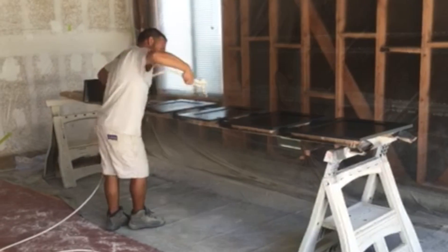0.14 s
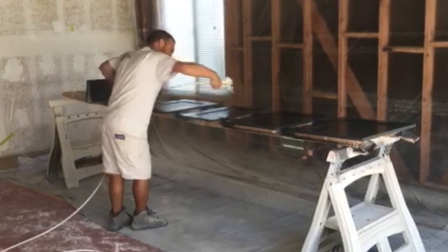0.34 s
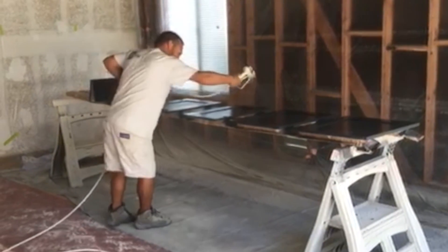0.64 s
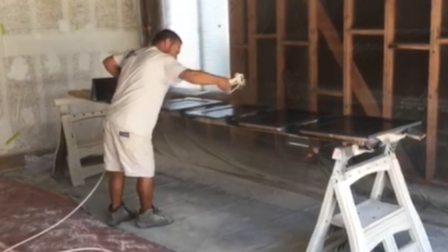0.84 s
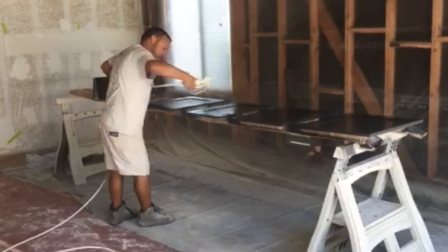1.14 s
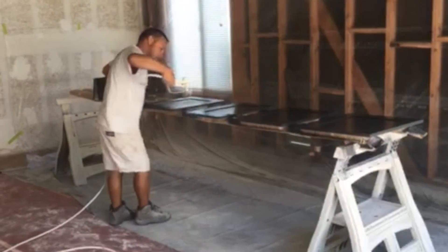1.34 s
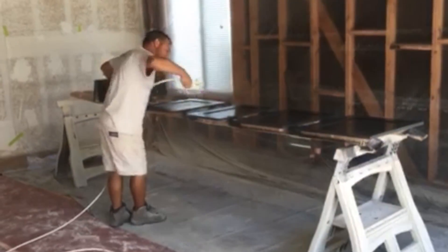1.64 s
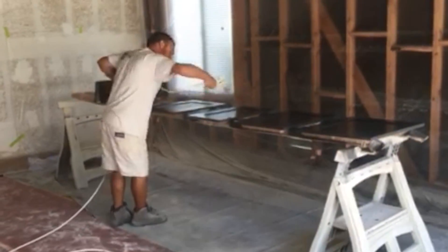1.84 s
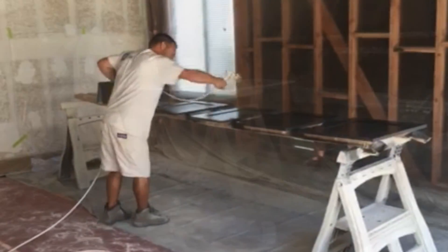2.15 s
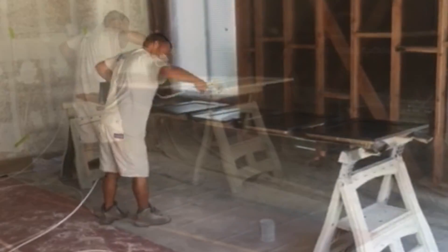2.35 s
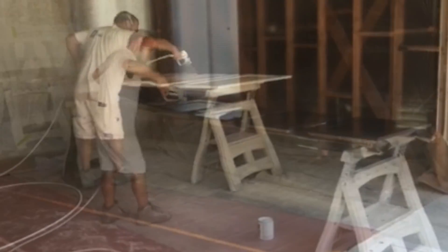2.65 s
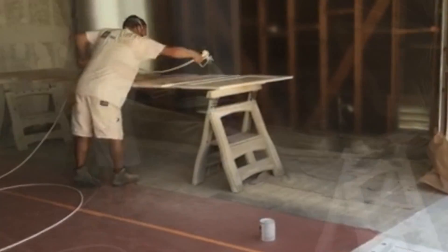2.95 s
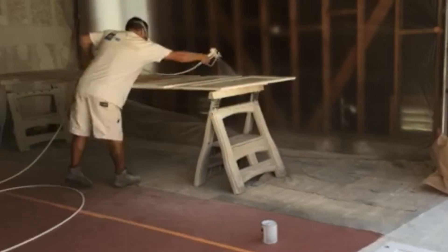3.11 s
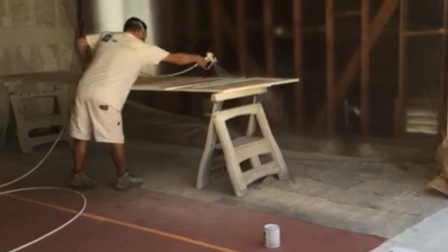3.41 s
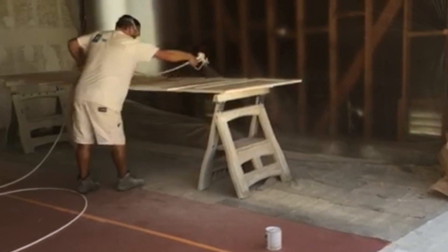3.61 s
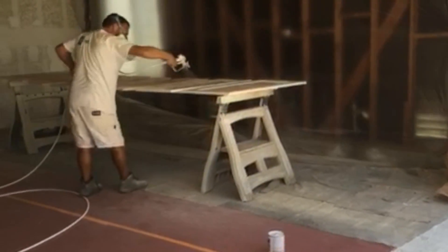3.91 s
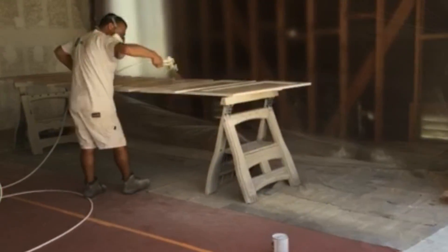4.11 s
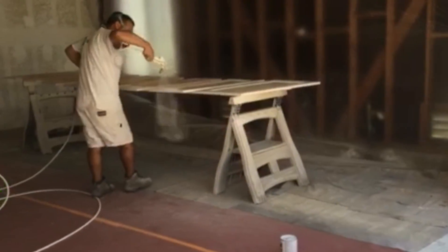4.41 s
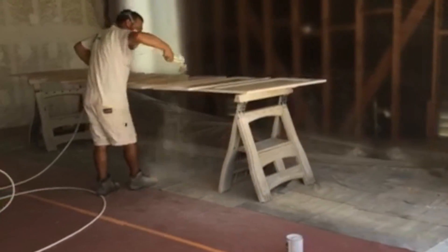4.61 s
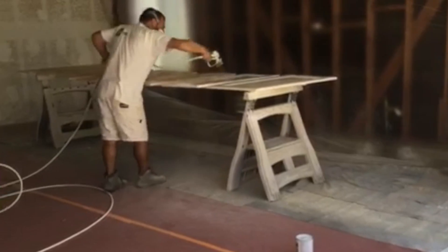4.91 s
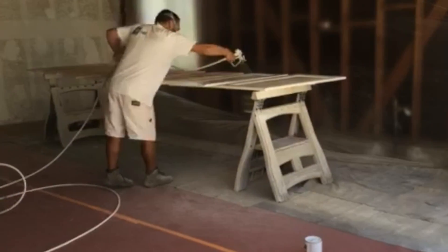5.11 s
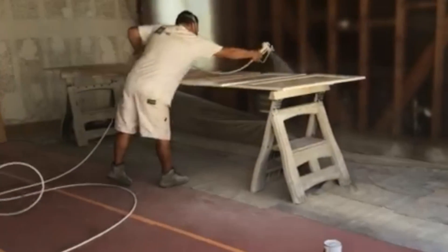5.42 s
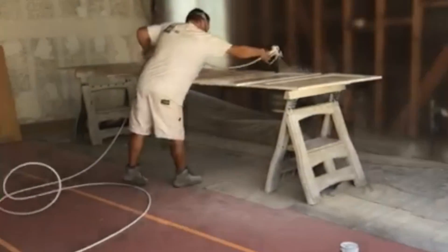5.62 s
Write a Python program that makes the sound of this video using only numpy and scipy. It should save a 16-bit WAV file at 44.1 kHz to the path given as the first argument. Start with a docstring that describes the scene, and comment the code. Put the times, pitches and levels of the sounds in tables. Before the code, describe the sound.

In a bare echoing garage, a paint sprayer's pump starts and stops, squealing on each stroke as hiss gives way to faint fizzing paint.

```python
"""A motor roars over a steady hiss while gears squeal: an airless paint pump in a bare garage.
It stops and starts again and again; each piston stroke makes a squeal that sags in pitch, and valves tick.
The hiss then falls away as the sound blends into a second, quieter view of the same room, where paint fizzes.
Roar, rasp, hiss and fizz are shaped noise; squeals are wavering tones; ticks are fading sine waves.
Sparse random echoes give the gears, valves and switch the ring of the garage."""
import sys
import numpy as np
from scipy import signal
from scipy.fft import rfft, irfft
from scipy.io import wavfile
from scipy.ndimage import uniform_filter1d

SR = 44100
rng = np.random.default_rng(int(sys.argv[2]) if len(sys.argv) > 2 else 0)


def store_wav(level_fs):
    """Save 16-bit WAV to argv[1]."""
    pcm = np.round(np.clip(np.atleast_2d(level_fs), -1, 1) * 32767)
    wavfile.write(sys.argv[1], SR, pcm.T.astype(np.int16))


N = 254016  # length in samples

# Piston strokes, which make the gears squeal and the motor work harder.
# Each row: start in seconds, squeal length in seconds, first pitch in Hz, last pitch in Hz,
# settling time constant in seconds, time to the loudest point in seconds, squeal level in dB before mixing,
# drop at the end in dB, how far the octave lies below in dB, motor surge in dB before its rise and fall.
STROKES = [ (0.0, 0.13, 1785, 1720, 0.028, 0.008, -45, 7, 14, 2.5),
           (0.156, 0.11, 2365, 2045, 0.024, 0.014, -40.5, 10, 21, 3.5),
           (0.291, 0.066, 2700, 2224, 0.015, 0.032, -40, 14, 18, 4.5),
           (0.422, 0.098, 2620, 2047, .025, .015, -38, 15, 20, 5),
           (0.563, 0.06, 2026, 1650, 0.046, .025, -47, 3, 9, 2.5),
           (0.822, 0.07, 1019, 659, 0.27, 0.026, -47.5, 5, 20, 3.5),
           (1.597, 0.081, 2180, 1906, 0.036, 0.06, -40.5, 22, 16, 3),
           (1.74, 0.1, 2550, 2095, 0.022, 0.019, -42, 11, 18, 5),
           (1.872, 0.11, 2480, 2124, 0.029, 0.024, -40.5, 14, 20, 5),
           (2.013, 0.062, 2057, 1623, .1, 0.042, -46.5, -2, 8, 3.5),
           (2.279, 0.069, 984, 609, .15, 0.023, -48.5, 6, 15, 6.5),
           (2.435, 0.046, 2290, 2142, .04, 0.021, -50.5, 10, 13, -2),
           (2.573, 0.036, 2430, 2170, 0.019, 0.015, -44, 16, 17, -0.5),
           (2.686, 0.055, 2490, 2010, 0.024, 0.026, -44, 9.5, 24, 3.5),
           (2.819, 0.061, 1920, 1280, 0.056, 0.065, -46, 10, 7.5, 4),
           (3.926, 0.102, 2223, 1893, 0.041, 0.018, -43, 9.5, 18, 3),
           (4.074, 0.072, 2430, 2097, 0.016, 0.037, -40, 22, 22, 3),
           (4.201, 0.084, 2273, 1363, 0.35, 0.014, -45.5, 4.5, 13, 3),
           (4.393, 0.071, 1391, 1265, 0.022, 0.0098, -44, 14, 14, 3),
           (5.287, 0.11, 2192, 1870, 0.038, 0.014, -43, 10, 22, 3.5),
           (5.433, 0.067, 2338, 2040, 0.095, 0.05, -40.5, 11, 20, 4),
           (5.575, 0.053, 2470, 2143, 0.013, 0.034, -39, 21, 19, 3.5),
           (5.71, 0.046, 2100, 1303, 0.27, 0.014, -41, 7, 10, 2)]


def amp(db):
    """Turns decibels into a plain multiplier."""
    return 10 ** (np.asarray(db) / 20)


def evened(x):
    """Scales a signal to an average (rms) strength of 1."""
    return x / np.sqrt(np.mean(x ** 2) + 1e-20)


def add(mix, s, sound):
    """Adds a sound into the mix from s seconds on, cut off at the end of the mix."""
    part = mix[round(s * SR):][:len(sound)]
    part += sound[:len(part)]


def curve(rows):
    """Start time, and columns joined by straight lines at the sample rate."""
    s, *columns = np.transpose(rows)
    t = np.arange(s[0], s[-1], 1 / SR)
    return s[0], [np.interp(t, s, c) for c in columns]


def noise(spectrum, patchy_db, band, size=1024):
    """Noise from random short-time spectra with drifting patches, scaled to about rms 1 within band (Hz)."""
    hop = size // 4
    hz = np.fft.rfftfreq(size, 1 / SR)
    real, imaginary, patches = rng.standard_normal((N // hop + 5, len(hz), 3)).T
    # Averaging neighbours in pitch and time makes the patches drift.
    patches = uniform_filter1d(patches, size=8, axis=0)
    patches = evened(uniform_filter1d(patches, size=8, axis=1))
    f, db = np.transpose(spectrum)
    shape = amp(np.interp(np.log(hz + 1), np.log(f), db, left=-99, right=-99))
    grains = (real + 1j * imaginary) * shape[:, None] * amp(patchy_db * patches)
    x = signal.istft(grains, nperseg=size, noverlap=size - hop)[1]
    inside = (hz > band[0]) & (hz < band[1])
    return evened(x[:N]) * np.sqrt(np.sum(shape ** 2) / np.sum(shape[inside] ** 2))


def wobble(count, hz):
    """Random drift of rms 1: noise with what is faster than about hz smoothed away."""
    low_pass = signal.butter(2, hz, fs=SR)
    return evened(signal.lfilter(*low_pass, rng.standard_normal(count + SR))[SR:])


def coloured(x, bumps):
    """Raises or lowers bell-shaped bands, as resonances and dips do."""
    hz = np.fft.rfftfreq(N, 1 / SR)
    gain_db = sum(db / (1 + (2 * (hz - f) / width) ** 2) for f, width, db in bumps)
    return irfft(rfft(x) * amp(gain_db), N)


def second_view():
    """Share of the second view of the room over time."""
    # The blend between the views. Each row: time in seconds, share of the second view.
    blend = [(2.3, 0), (2.75, 0.89)]
    return np.interp(np.arange(N) / SR, *np.transpose(blend))


def surges():
    """Extra motor effort in dB: each stroke loads the motor suddenly and lets go slowly."""
    rise_s, fall_s = 0.017, 0.074
    t, out = np.arange(SR // 4) / SR, np.zeros(N)
    for s, *_, db in STROKES:
        add(out, s, db * np.minimum(t / rise_s, 1) * np.exp(-(t / fall_s) ** 2))
    return out


def motor():
    """Noise as the roar through the housing and the rasp of brushes and bearings, rising and falling each run."""
    # One table a motor run, giving its level between strokes.
    # Each row: time in seconds, roar level in dB, level in dB of the rasp above the roar's pitch.
    run_levels = [
        [(0.0, -47, -52), (0.3, -44.5, -52), (0.62, -47, -54), (0.71, -51.5, -62), (0.81, -55.5, -65),
         (0.9, -56.5, -79), (1.06, -82, -95)],
        [(1.386, -55.5, -64), (1.47, -49.5, -59), (1.6, -46, -53.5), (2.0, -46, -52), (2.2, -52, -63.5),
         (2.3, -56, -75), (2.42, -63, -91)],
        [(2.42, -62, -68), (2.66, -57.5, -58), (2.93, -56.5, -62.5), (3.04, -63, -68), (3.18, -64.5, -72),
         (3.3, -76, -87), (3.4, -88, -88)],
        [(3.703, -63, -65), (3.73, -57, -67), (3.82, -55, -59), (4.0, -52.5, -54.5), (4.25, -53, -54.5),
         (4.43, -57.5, -62.5), (4.56, -65.5, -76), (4.74, -82, -80)],
        [(5.104, -60.5, -70), (5.24, -52.5, -55), (5.29, -53.5, -54), (5.55, -51.5, -52), (5.76, -53.5, -56)],
    ]
    # Colour of the roar in each view. Each row: pitch in Hz, relative strength in dB per Hz.
    roar_near, roar_far = [(71, -46), (120, -22), (188, -24), (292, -3), (408, -12), (577, -5), (639, 1.5),
                           (766, -5), (860, -10), (917, -0.5), (1110, -1), (1480, -11), (1960, -10.5),
                           (2140, -13.5), (2600, -8), (3380, -35), (5720, -120)], [(71, -67.5), (120, -39), (188, -14), (315, -4.5), (345, -3.5),
                                              (392, -15), (527, -8.5), (665, -4.5), (766, -11.5),
                                              (978, -3.5), (1350, -8), (1570, -9.5), (1860, -12.5),
                                              (2090, -9), (2600, -15.5), (3380, -56), (5720, -120)]
    # Colour of the rasp. Each row: pitch in Hz, relative strength in dB per Hz.
    rasp_colour = [(1410, -29), (2400, 0.5), (2590, -40), (2740, 2), (2940, -7), (3160, 2), (3780, -5.5),
                   (5150, -7), (6090, -11), (8210, -17), (10000, -41), (13000, -57), (22000, -120)]
    # Housing panels that sing. Each row: pitch in Hz, width in Hz, boost in dB.
    panels = [(308, 23, 2), (631, 11, 4.5), (822, 6.9, 10.5), (945, 18, 1.5), (1130, 12, 7), (1090, 20, 1),
              (1337, 13, 9), (2770, 21, 8), (3330, 29, 7), (4060, 17, 8.5), (5430, 38, 10.5), (6600, 68, 0)]
    rasp_surge = 1.48  # the rasp surges by this many times the roar's dB

    share, surge_db = second_view(), surges()
    near = np.sqrt(1 - share) * noise(roar_near, 1.8, (200, 1250))
    far = np.sqrt(share) * noise(roar_far, 1.9, (200, 1250))
    roar = coloured(near + far, panels) * amp(surge_db)
    rasp = coloured(noise(rasp_colour, 2.25, (2700, 5000), size=256), panels)
    rasp = rasp * amp(0.52 * wobble(N, hz=120) + rasp_surge * surge_db)
    out = np.zeros(N)
    for rows in run_levels:
        s, (roar_db, rasp_db) = curve(rows)
        span = np.minimum(round(s * SR) + np.arange(len(roar_db)), N - 1)
        add(out, s, amp(roar_db) * roar[span] + amp(rasp_db) * rasp[span])
    return out


def air():
    """Hiss and rumble of the room as shaped noise; the second view comes in as the first fades."""
    # Colour of the air in each view. Each row: pitch in Hz, relative strength in dB per Hz.
    air_near, air_far = [(15, -36), (25, -16), (91, -1), (216, -8.5), (254, -15), (351, -10), (472, -13),
                         (652, -14.5), (901, -16), (1180, -11.5), (1500, -20), (1920, -18.5), (4080, -7.5),
                         (12000, -8), (15700, -12.5)], [(15, -35), (25, -15.5), (53, -4.5), (194, -16.5), (216, -20),
                                           (254, -16), (413, -22.5), (485, -16), (767, -23), (901, -17.5),
                                           (1550, -30.5), (3560, -25), (4300, -23), (11100, -28.5),
                                           (15700, -31.5)]
    # Loudness of the first view. Each row: time in seconds, treble level in dB.
    near_level = [(0.0, -56), (2.36, -56.5), (2.71, -62), (2.78, -76)]
    far_db = -72  # treble level of the second view, before its share
    t, treble = np.arange(N) / SR, (9500, 15000)
    near_db = np.interp(t, *np.transpose(near_level), right=-120)
    near = amp(near_db) * noise(air_near, 1.0, treble, size=2048)
    return near + second_view() * amp(far_db) * noise(air_far, 1.1, treble, size=2048)


def settling(t, first_hz, last_hz, settle_s):
    """Pitch moves quickly at first, then comes to rest on its last value."""
    left = np.exp(-t / settle_s)
    return last_hz + (first_hz - last_hz) * (left - left[-1]) / (1 - left[-1])


def swelling(t, swell_s, start_db, end_db):
    """Level in dB: up to the loudest point, then down, with most of the drop coming early."""
    top = min(swell_s, .9 * t[-1])
    bend = top + 0.34 * (t[-1] - top)  # 34% of the fade time takes 64% of the drop
    return np.interp(t, [0, top, bend, t[-1]], [start_db, 0, 0.64 * end_db, end_db])


def squeal(hz, db, octave_db):
    """Gear teeth in contact: a tone and its octave start suddenly, waver, and are smeared by grit."""
    grit_share = .34  # part of the squeal smeared into a band by uneven tooth contact
    count = len(hz)
    turns = np.cumsum(hz * (1 + 0.0067 * wobble(count, hz=89))) / SR
    grit = (wobble(count, hz=152) + 1j * wobble(count, hz=151)) / np.sqrt(2)
    steady = evened(amp(3.3 * wobble(count, hz=48.5)))
    carrier = np.sqrt(1 - grit_share ** 2) * steady + grit_share * grit
    tone = amp(db) * np.exp(2j * np.pi * turns)
    tone = tone + amp(octave_db) * np.exp(4j * np.pi * turns)
    t = np.arange(count) / SR
    fade_in, fade_out = np.minimum(t / 0.0018, 1), np.minimum(t[::-1] / 0.0034, 1)
    return np.sqrt(2) * (carrier * tone).real * fade_in * fade_out


def stroke(s, length, first_hz, last_hz, settle_s, swell_s, db, fade_db, octave_db, surge_db):
    """The load bites: the pitch of the meshing teeth sags and the squeal swells, then fades."""
    t = np.arange(0, length, 1 / SR)
    level_db = db + swelling(t, swell_s, -8.5, -fade_db)  # starts 8.5 dB below its loudest point
    return s, squeal(settling(t, first_hz, last_hz, settle_s), level_db, level_db - octave_db)


def valves():
    """Each tick rings the steel valve body: several sine waves die away together."""
    # Valve ticks. Each row: time in seconds, level in dB before the ringing tones and mixing.
    tick_rows = [(0.157, -46), (0.2016, -37), (0.2937, -35), (0.3416, -44), (0.4255, -29), (0.4788, -34),
                 (0.581, -47), (1.74, -32), (1.8716, -32), (2.0316, -38), (2.556, -40), (2.6087, -42),
                 (2.6805, -35), (2.822, -40), (2.9266, -44), (3.8413, -36.5), (3.9285, -37),
                 (3.9828, -34.5), (4.0725, -29), (4.1034, -34.5), (4.135, -34), (4.2063, -44),
                 (4.2448, -40), (4.405, -42), (5.2964, -39), (5.3587, -37), (5.4304, -36.5), (5.576, -37),
                 (5.5976, -43), (5.7299, -36)]
    # Tones of the valve body. Each row: pitch in Hz before detuning, relative level in dB,
    # time to fade by 60 dB in seconds.
    body_tones = [(5204, -9, 0.032), (5480, -17, .02), (3900, -16.5, 0.021), (6780, -19, 0.023),
                  (2800, -9.5, 0.024), (4920, -9.5, 0.025), (8200, -19, 0.011)]
    t, out = np.arange(3000) / SR, np.zeros(N)
    detune = rng.uniform(0.96, 1.02, (len(tick_rows), len(body_tones)))
    for (s, db), tune in zip(tick_rows, detune):
        ring = np.zeros(len(t))
        for (hz, level_db, t60), k in zip(body_tones, tune):
            ring += amp(level_db - 60 * t / t60) * np.sin(2 * np.pi * hz * k * t)
        add(out, s, amp(db) * np.minimum(t / 0.0024, 1) * ring)
    return out


def whine(s, length, first_hz, last_hz, settle_s, swell_s, db, octave_db):
    """Gears glide in pitch without load as the motor gathers or loses speed."""
    t = np.arange(0, length, 1 / SR)
    level_db = db + swelling(t, swell_s, -8.5, -7)  # start and end against the loudest point
    hz = settling(t, first_hz, last_hz, settle_s)
    # The octave carries best at 2250 Hz and loses 19.8 dB for each 1000 Hz away from it.
    octave_loss_db = 0.0198 * abs(2 * hz - 2250)
    return s, squeal(hz, level_db, level_db - octave_db - octave_loss_db)


def switch():
    """A dry clack of fading noise as the pressure switch starts the motor and the gears take up slack."""
    # Motor starts. Each row: time in seconds, clack level in dB before a 9.5 dB cut and mixing.
    clacks = [(1.389, -48.5), (3.704, -52), (5.102, -52)]
    t, out = np.arange(1500) / SR, np.zeros(N)
    band = signal.butter(2, [400, 4500], "bandpass", fs=SR)
    for (s, db), grain in zip(clacks, rng.standard_normal((len(clacks), len(t)))):
        fade = amp(db - 9.5 - 60 * t / 0.068)
        add(out, s, fade * evened(signal.lfilter(*band, grain)))
    return out


def spray():
    """Fine fizz of high noise as paint leaves the tip while the trigger is held."""
    # Colour of the fizz. Each row: pitch in Hz, relative strength in dB per Hz.
    fizz_colour = [(4500, -30), (6000, -8.5), (8000, -6), (11000, -10), (13000, -11), (15700, -36)]
    # Loudness of the fizz. Each row: time in seconds, level in dB.
    fizz_level = [(2.9, -95), (2.95, -72), (3.3, -76), (3.82, -102), (3.845, -68.5), (4.62, -71),
                  (5.16, -95), (5.2, -70), (5.6, -65), (5.76, -72)]
    db = np.interp(np.arange(N) / SR, *np.transpose(fizz_level), left=-120)
    return amp(db) * noise(fizz_colour, 1.4, (4500, 15700), size=512)


def thump():
    """A bump at the microphone: a low push of about three cycles that sinks in pitch."""
    # One row: time in seconds, peak level in dB, first pitch in Hz, pitch it sinks towards in Hz,
    # length in seconds.
    bump = (2.9245, -40, 90, 50, .052)
    s, db, first_hz, last_hz, length = bump
    u, out = np.arange(0, length, 1 / SR) / length, np.zeros(N)  # u runs from 0 to 1
    hz = last_hz + (first_hz - last_hz) * np.exp(-u / .3)
    push = np.sin(2 * np.pi * np.cumsum(hz) / SR)
    add(out, s, -amp(db) * push * np.sin(np.pi * u ** .65))
    return out


def garage(x):
    """Echoes off bare walls: sparse taps of random sign, each band dying at its own speed."""
    # How long the room rings. Each row: pitch in Hz, time to fade by 60 dB in seconds.
    ring_times = [(250, 1), (1000, 0.27), (2200, 0.47), (4000, 0.99), (8000, 0.18)]
    taps = np.zeros(SR // 2)
    at = np.arange(200, SR // 2 - 20, 20)
    taps[at + rng.integers(0, 20, len(at))] = rng.choice([-1., 1.], len(at))
    hz, t, z = signal.stft(taps, SR, nperseg=256)
    f, t60 = np.transpose(ring_times)
    fade = amp(-60 * t / np.interp(hz, f, t60)[:, None])
    tail = signal.istft(z * fade, SR, nperseg=256)[1]
    return signal.fftconvolve(x, tail / np.linalg.norm(tail))[:N]


def scene():
    """Mixes the pump, its echoes and the room into two equal channels."""
    # Gear whines. Each row: start in seconds, length in seconds, first pitch in Hz, last pitch in Hz,
    # settling time constant in seconds, time to the loudest point in seconds, level in dB before mixing,
    # how far the octave lies below in dB before its further loss.
    whine_rows = [(0.61, 0.072, 1226, 1060, 0.015, 0.014, -44.5, 10),
                  (0.715, 0.089, 991, 910, .06, 0.044, -50.5, 15),
                  (1.419, 0.11, 748, 1148, 0.049, 0.058, -41.5, 10.5),
                  (2.061, 0.069, 1277, 980, 0.026, 0.012, -46, 10),
                  (2.162, 0.085, 972, 927, .06, 0.068, -51, 15),
                  (2.962, .27, 802, 690, 0.093, 0.042, -59.5, 12),
                  (3.721, 0.1, 651, 1170, .15, 0.11, -53.5, -2.5),
                  (4.428, 0.074, 1016, 613, 0.11, 0.014, -55.5, 10),
                  (5.118, 0.096, 559, 1090, .07, 0.076, -56.5, 0),
                  (5.208, 0.043, 1580, 1720, .05, .025, -55, 15)]
    gears = np.zeros((3, N))  # three groups, so that echoes differ a little from stroke to stroke
    gear_sounds = [stroke(*row) for row in STROKES] + [whine(*row) for row in whine_rows]
    for k, sound in enumerate(gear_sounds):
        add(gears[k % 3], *sound)
    gears[0] += valves() + switch()
    echoes = amp(-3.5) * sum(garage(g) for g in gears)
    mix = amp(2.5) * gears.sum(0) + echoes + motor() + air() + spray() + thump()
    return np.array([mix, mix])


def record(dry):
    """One microphone on both channels: its colour and bass cut, then a limit on the treble."""
    # Dips carved by the body around the microphone and the bounce off the floor.
    # Each row: pitch in Hz, width in Hz, change in dB.
    dips = [(440, 238, -4.5), (1548, 160, -5), (2603, 440, -6), (3290, 310, -4.5), (7610, 470, -3.5),
            (10280, 370, -3.5), (14000, 500, -0.5)]
    bass_cut = signal.butter(3, 36, "highpass", fs=SR, output="sos")
    heard = signal.sosfilt(bass_cut, coloured(dry, dips))
    treble_limit = signal.firwin(511, 15750, window=("kaiser", 9), fs=SR)  # edge at 15750 Hz
    return signal.oaconvolve(heard, treble_limit[None], "same")


dry = scene()
out = record(dry)
store_wav(out)
```